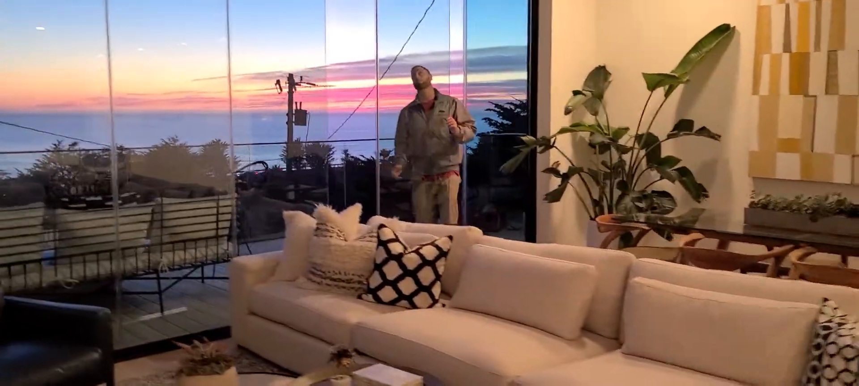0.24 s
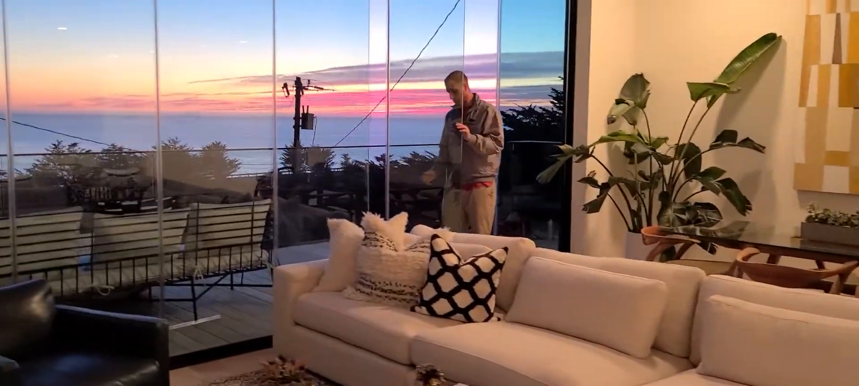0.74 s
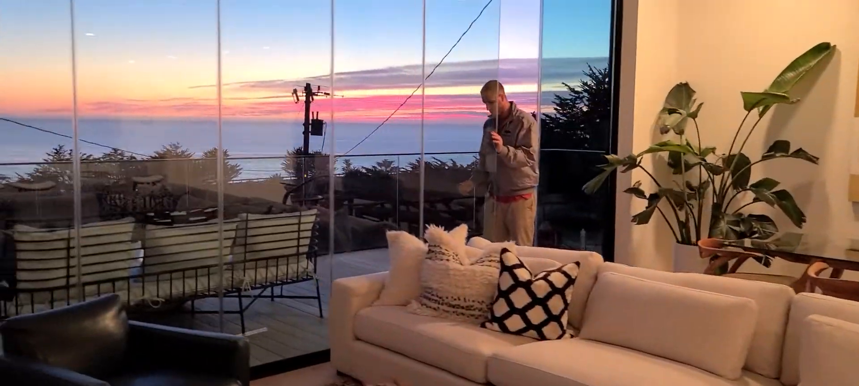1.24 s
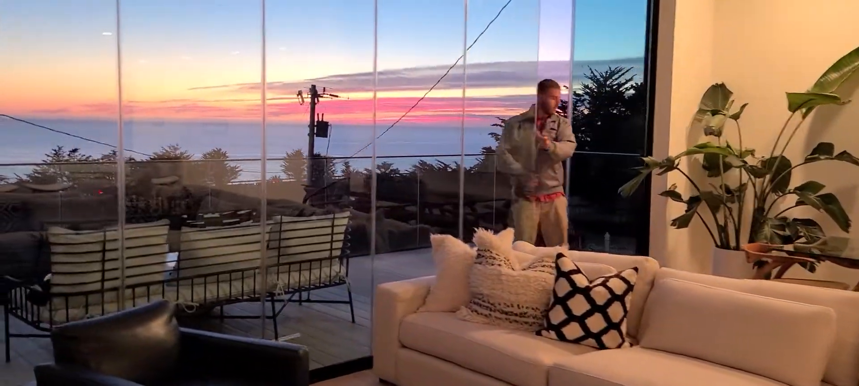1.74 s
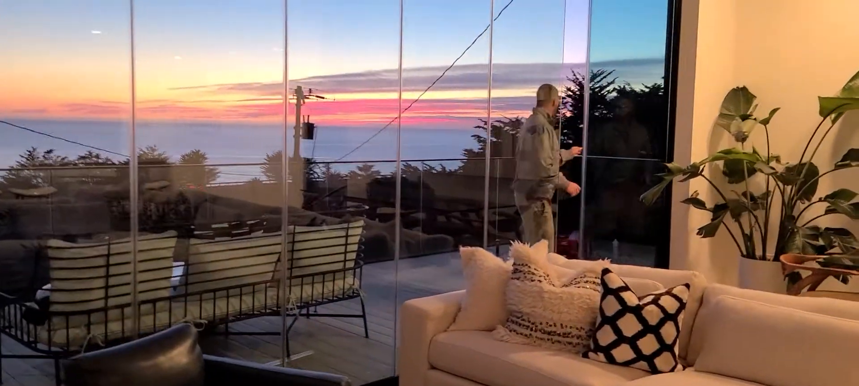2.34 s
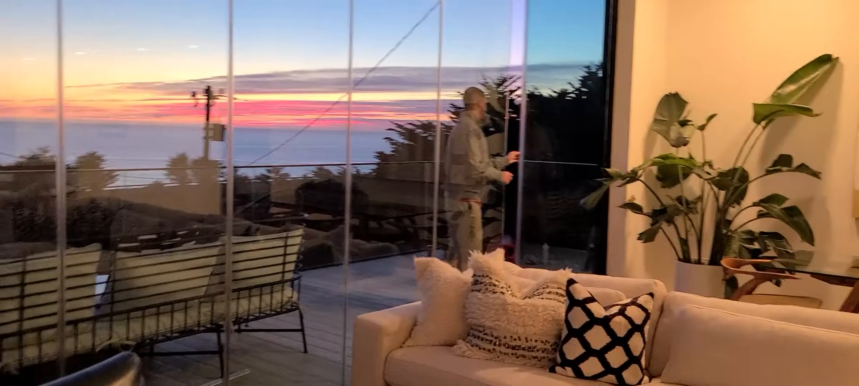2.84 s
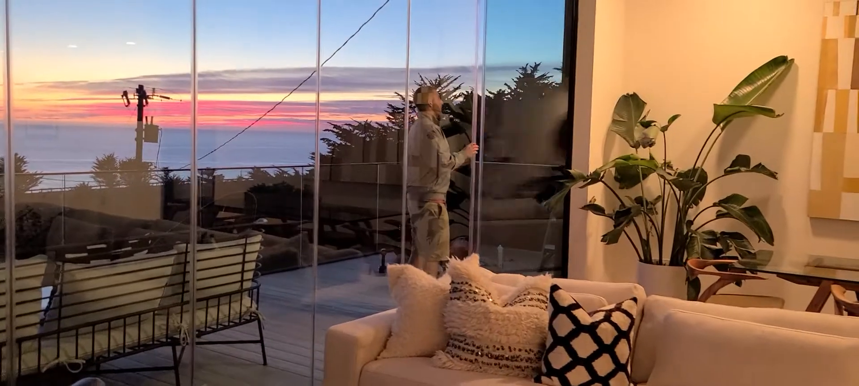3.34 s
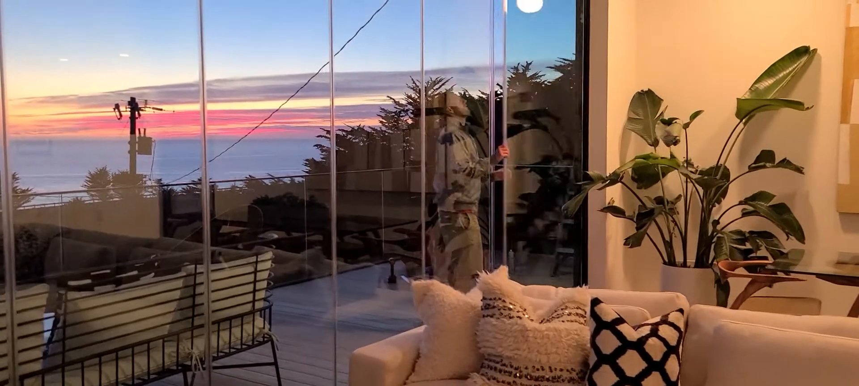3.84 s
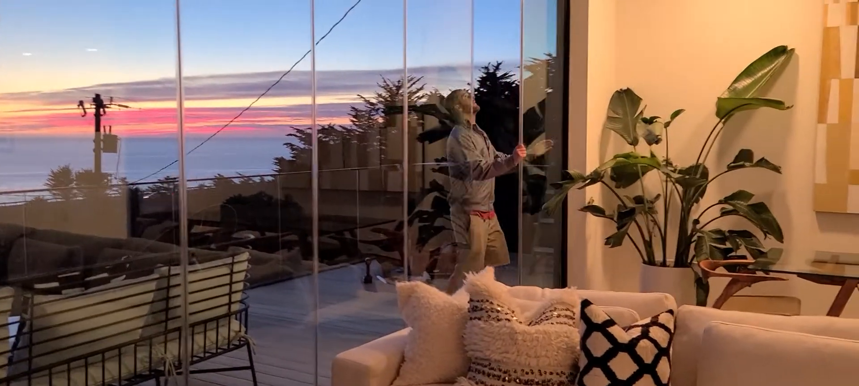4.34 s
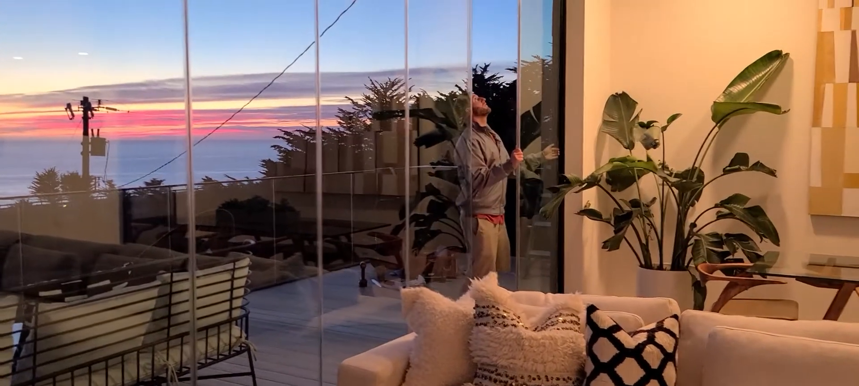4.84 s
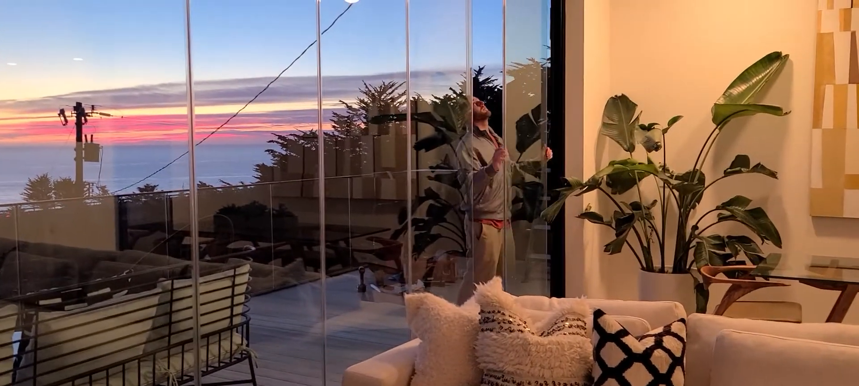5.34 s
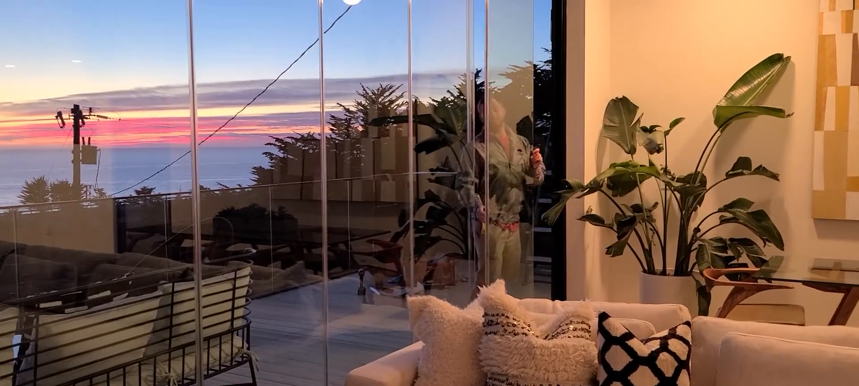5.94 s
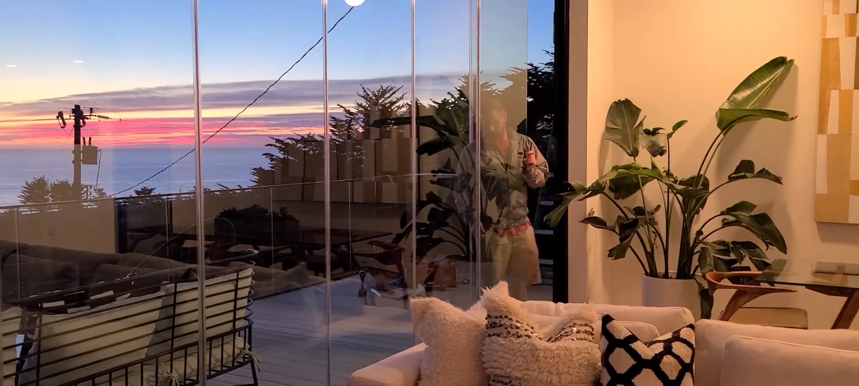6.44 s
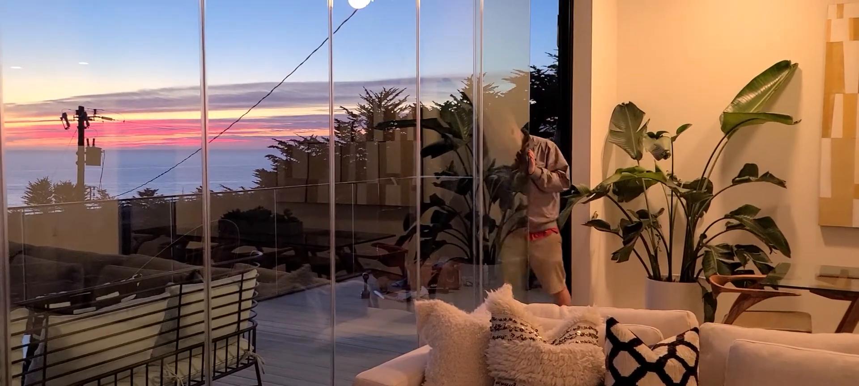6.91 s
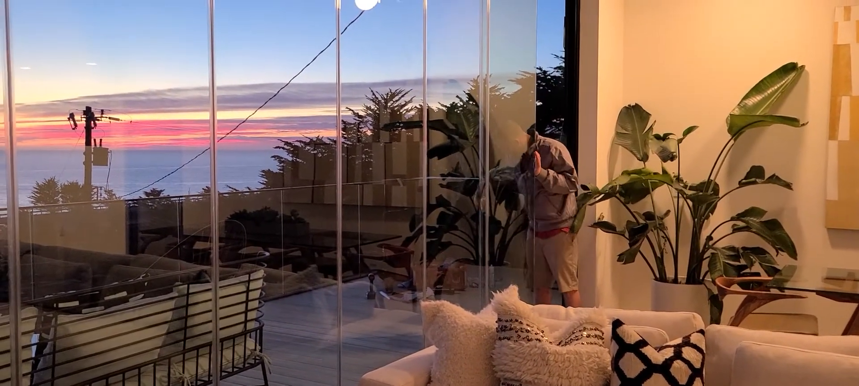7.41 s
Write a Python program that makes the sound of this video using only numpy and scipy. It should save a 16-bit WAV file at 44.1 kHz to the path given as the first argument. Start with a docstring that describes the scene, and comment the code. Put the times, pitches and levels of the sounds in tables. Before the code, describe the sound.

A large, hard, reverberant living room with a faint steady outdoor wash, heard in stereo. From 0 s a heavy glass pane is already rolling on its track, a bright gritty rumble with low boom, gradually easing; a soft dull step falls at 0.9 s. At 1.2-1.3 s four quick, bright, loud knocks crash together with a deep thump and ring into the room. From 1.7 to 3.9 s it is quiet: soft near footsteps at 1.7, 2.6, 2.7 and 3.4 s, with brushing scuffs of shoes and clothes. At 4.0-4.6 s a short, duller push clatters lightly, with a low boom at 4.4 s. From 4.9 s a third push rolls, strongest around 5.1-5.3 s with small rattles, thinning, then a bump at 6.3 s. At 6.5-6.6 s heavy clunks slam with a boom and decay. A faint scuff and tiny knock end it near 7.5 s.

```python
"""Heavy glass panels roll along a track in a large, hard living room, over a distant outdoor wash.
A first push is already rolling and ends in bright knocks at about 1.2 s; soft steps, the first during that
push, and brushing scuffs are heard among the pushes. A second push at 4 s clatters lightly; a third, from
4.9 s, ends in the heavy knocks near 6.6 s, and one faint knock comes last. Rollers are dense clicks, booms
and brushing shaped noise, steps damped sines; a knock is a short rattle exciting pane modes and room."""
import sys
import numpy as np
from scipy import signal
from scipy.fft import rfft, irfft
from scipy.io import wavfile
from scipy.ndimage import uniform_filter1d

SR = 44100
rng = np.random.default_rng(int(sys.argv[2]) if len(sys.argv) > 2 else 0)


def store_pcm(level_fs):
    """Save levels as 16-bit WAV."""
    pcm = np.round(np.clip(level_fs, -1, 1) * 32767).astype(np.int16)
    wavfile.write(sys.argv[1], SR, np.atleast_2d(pcm).T)


N = 338247

# spectral colour of a struck pane and frame: pitch_hz, density_db (per Hz)
PANE_COLOUR = [(24, -32), (45, 2), (120, -9.5), (200, -9.5), (290, -5), (420, -1), (670, -6), (950, -9),
               (1280, -5.5), (1820, -10), (2200, -21.5), (3400, -27), (7000, -47.5), (9000, -63.5),
               (15500, -68)]
# what each push sets off, against its load: brightness_db, flexing_db, hiss_db
PUSH_OFFSETS = [(9.5, 1, -10.5), (-21, -10, -16), (-12, -0.5, -15.5)]


def gain_of(db):
    """Level: 20 dB is a factor of ten in amplitude."""
    return 10 ** (np.asarray(db) / 20)


def evened(x):
    """Normalisation: scales a signal to unit root-mean-square."""
    return x / np.sqrt(np.mean(x ** 2) + 1e-20)


def read(points, hz):
    """Logarithmic pitch scale: interpolates a curve evenly per octave."""
    f, value = np.transpose(points)
    return np.interp(np.log(hz + 1), np.log(f + 1), value)


def coloured(x, db_of):
    """Linear filtering: multiplies the spectrum by a gain given in dB as a function of frequency."""
    size = x.shape[-1]
    hz = np.fft.rfftfreq(size, 1 / SR)
    return irfft(rfft(x) * gain_of(db_of(hz)), size)


def causal(db):
    """Minimum phase: folding the cepstrum gives a filter of this gain that answers only once struck."""
    cepstrum = irfft(np.log(gain_of(np.maximum(db, -100))))
    half = len(cepstrum) // 2
    cepstrum[1:half] *= 2
    cepstrum[half + 1:] = 0
    return np.exp(rfft(cepstrum))


def diffuse(length, patchy_db=0):
    """Diffuse-field coherence: two channels of noise, alike in the bass and mostly unrelated in the treble."""
    # likeness of the two channels: pitch_hz, coherence (0 to 1)
    coherence = [(60, 0.98), (130, 0.97), (290, 0.99), (640, 0.4), (1410, 0.21), (3100, 0.083), (6820, 0.1),
                 (15000, 0.16)]
    lag_s, lag_from_hz = 0.000458, 700  # the shared part reaches the right port later above this pitch
    hz = np.fft.rfftfreq(512, 1 / SR)
    a, b, c, d, patches = rng.standard_normal((length // 128 + 5, 257, 5)).T
    patches = uniform_filter1d(patches, size=6, axis=0)  # smooth over frequency, then over time
    patches = evened(uniform_filter1d(patches, size=24, axis=1))
    same = np.clip(read(coherence, hz), -1, 1)[:, None]
    left, unrelated = a + 1j * b, c + 1j * d
    lag = np.exp(-2j * np.pi * hz * lag_s / (1 + (lag_from_hz / (hz + 1)) ** 3))[:, None]
    right = same * left * lag + np.sqrt(1 - same ** 2) * unrelated
    z = np.array([left, right]) * gain_of(patchy_db * patches)
    return evened(signal.istft(z, nperseg=512, noverlap=384)[1][:, :length])


def room(early_db=6, early_s=.012, build_s=.012):
    """Reverberation: a quick cluster of first arrivals, then a tail that fills in and dies band by band."""
    # decay time of the room: pitch_hz, t60_s
    decay = [(60, 1), (160, 0.84), (420, 0.85), (1100, 0.96), (2900, 0.92), (5400, 0.87), (7700, 0.65),
             (11000, 0.52), (15000, 0.23)]
    hz, t, z = signal.stft(diffuse(SR * 3 // 2), SR, nperseg=256)
    t60 = np.maximum(read(decay, hz), .1)[:, None]
    tail = signal.istft(z * gain_of(-60 * t / t60), SR, nperseg=256)[1]
    t = np.arange(tail.shape[1]) / SR
    early = gain_of(early_db) * np.exp(-t / early_s)
    tail = tail * (early + 1 - np.exp(-t / build_s))
    return tail / np.linalg.norm(tail[0])


def load(t, offsets_db, share, fade):
    """Driven friction: gain of a layer following the roller load during each push, by a share of its dB."""
    # load on the rollers, one list a push: time_s, load_db
    pushes = [
        [(0, -38.5), (.1, -44), (.7, -48), (1.17, -53)],
        [(4.03, -47.5), (4.2, -51), (4.35, -46), (4.6, -50)],
        [(4.93, -52.5), (5.03, -41), (5.14, -37), (5.28, -42.5), (5.45, -43), (5.65, -47), (6.18, -50),
         (6.35, -41), (6.52, -59)],
    ]
    mean_load_db = -47
    out = np.zeros(len(t))
    for rows, offset_db in zip(pushes, offsets_db):
        s, db = np.transpose(rows)
        on = ((t >= s[0]) | (s[0] <= 0)) & (t <= s[-1])  # the first push began earlier
        followed_db = share * (np.interp(t, s, db) - mean_load_db)
        out += on * gain_of(offset_db + mean_load_db + followed_db)
    return uniform_filter1d(out, int(fade * SR) + 1)  # fade in seconds


def swells(rows):
    """Addition of powers: separate swells rise to a peak and decay exponentially, straight lines in dB."""
    t = np.arange(N) / SR
    power = 0
    for s, db, rise, fall in rows:
        level_db = db - rise * np.maximum(s - t, 0) - fall * np.maximum(t - s, 0)
        power = power + gain_of(level_db) ** 2
    return power


def wash():
    """Broadband noise: the steady outdoor wash through the opening is coloured, faintly patchy noise."""
    # colour of the outdoor wash: pitch_hz, density_db (per Hz)
    colour = [(12, -33), (20, -42), (59, -11), (106, -5.5), (166, -29), (232, -3.5), (416, -6), (746, -1),
              (1040, -7), (1630, -5.5), (2470, -20.5), (5850, -34), (7310, -28.5), (8400, -40.5),
              (15500, -39)]
    level_db = -55.5
    noise = diffuse(N, patchy_db=2.0)
    return gain_of(level_db) * evened(coloured(noise, lambda hz: read(colour, hz)))


def steps(rooms):
    """Damped oscillation: each soft near step is a few dull cycles, dry and central, with a little room."""
    # soft steps near the microphone: start_s, level_db, pitch_hz
    footfalls = [(0.858, -29.5, 342), (1.733, -30, 206), (2.572, -38.5, 248), (2.723, -38.5, 99),
                 (3.383, -43.5, 196)]
    t60_s, rise_s, room_db = .05, 0.00067, -9
    out, t = np.zeros(N + SR), np.arange(4000) / SR
    envelope = gain_of(-60 * t / t60_s) * (1 - np.exp(-t / rise_s))
    for s, db, hz in footfalls:
        out[round(s * SR):][:len(t)] += gain_of(db) * envelope * np.sin(2 * np.pi * hz * t)
    reverberant = signal.fftconvolve(out[None, :N], rooms[0], axes=1)[:, :N]
    return out[:N] + gain_of(room_db) * reverberant


def scuffs():
    """Friction noise: the hiss of a sliding pane, and shoes and clothes brushing, each with its own treble."""
    # colour of brushing: pitch_hz, density_db (per Hz)
    colour = [(300, -22), (1000, 8.5), (2500, 1.5), (4000, -2.5), (7000, -11.5), (9000, -18.5),
              (15500, -20.5)]
    # shoes and clothes brushing: peak_s, level_db, fall_db_per_s, treble_db (against level_db)
    brushes = [(1.68, -53.5, 50, -3), (1.9, -54.5, 42, -2.5), (2.39, -55.5, 83, -4), (2.64, -66.5, 82, 7),
               (2.78, -53.5, 46, -11), (3.42, -64.5, 54, 8), (3.55, -65, 90, -1), (3.88, -68, 93, 4),
               (4.2, -52, 74, -1), (4.34, -51.5, 100, 3), (5.25, -49.5, 41, -1.5), (7.28, -56, 59, -12),
               (7.5, -64, 69, -4)]
    rise_ratio = 1.73  # a scuff rises this many times as fast as it falls
    hiss = evened(coloured(diffuse(N, patchy_db=.6), lambda hz: read(colour, hz)))
    treble = coloured(hiss, lambda hz: -30 / (1 + (hz / 5000) ** 6))
    hiss_db = [push[2] for push in PUSH_OFFSETS]
    sliding = load(np.arange(N) / SR, hiss_db, share=0.78, fade=.04)
    body = swells([(s, db, rise_ratio * fall, fall) for s, db, fall, _ in brushes])
    top = swells([(s, db + treble_db, rise_ratio * fall, fall) for s, db, fall, treble_db in brushes])
    return (hiss - treble) * np.sqrt(sliding ** 2 + body) + treble * np.sqrt(sliding ** 2 + top)


def boom():
    """Flexural vibration: low, nearly mono noise follows the pushes and swells at each boom."""
    # colour of flexing: pitch_hz, density_db (per Hz)
    colour = [(8.8, -45), (15, -1.5), (49, 1), (69, -2), (113, -10.5), (183, -14.5), (200, -15), (260, -13),
              (440, -120)]
    # booms of the panes and the floor: peak_s, level_db, rise_db_per_s, fall_db_per_s
    surges = [(0.01, -36.5, 100, 50), (1.05, -43, 56, 80), (1.24, -25.5, 500, 67), (1.33, -29, 200, 78),
              (1.75, -49, 60, 22), (2.6, -53, 107.5, 16), (3.87, -56.5, 46, 123), (4.42, -31.5, 300, 59),
              (5.27, -39, 77, 37), (5.99, -46.5, 100, 62), (6.61, -27.5, 190, 74), (7.32, -50.5, 55, 90)]
    rest_db = -62.5  # flexing never quite stops
    low = evened(coloured(diffuse(N), lambda hz: read(colour, hz)))
    flexing_db = [push[1] for push in PUSH_OFFSETS]
    rolling = load(np.arange(N) / SR, flexing_db, share=0.5, fade=0.062)
    return low * np.sqrt(rolling ** 2 + swells(surges) + gain_of(rest_db) ** 2)


def rollers(rooms):
    """Random impulse excitation: grit under the rollers sends dense uneven clicks into the pane."""
    lead = SR  # samples of rolling already under way, so that the room is filled from the start
    t = np.arange(-lead, N) / SR
    click_db = 4.6 * np.minimum(rng.exponential(1, len(t)), 5)
    struck = rng.random(len(t)) < 1500 / SR  # 1500 clicks a second on average
    clicks = gain_of(click_db) * struck * rng.choice([-1, 1], len(t))
    grit = evened(coloured(clicks, lambda hz: read(PANE_COLOUR, hz)))
    treble = coloured(grit, lambda hz: -12 * np.log2(1 + 2500 / (hz + 1)))
    bright_db = [push[0] for push in PUSH_OFFSETS]
    body_gain = load(t, [0, 0, 0], share=1, fade=.0067)
    treble_gain = load(t, bright_db, share=1, fade=.0067)
    rolling = (grit - treble) * body_gain + treble * treble_gain
    # the pane travels, so the path through the room keeps changing
    turn = np.pi * t * 1.5
    paths = [np.cos(turn), np.sin(turn)]
    heard = sum(signal.fftconvolve((rolling * p)[None], r, axes=1) for p, r in zip(paths, rooms))
    return heard[:, lead:lead + N]


def knocks(rooms):
    """Modal excitation: a short rattling contact takes the pane's colour, rings its modes, fills the room."""
    # knocks of pane on stop or pane: start_s, blow_db, brightness_db_per_octave (above 1500 Hz),
    # bass_db, best_excited_mode_hz, ringing_db (against the thud)
    blows = [(1.185, 12, 9, -28, 1590, -19), (1.217, 14.5, 6, -6.5, 1630, -17),
             (1.265, 14, 2.5, -15, 388, -8), (1.324, 5.5, -4, -12, 1630, -20),
             (4.015, -7.5, 3, -11, 2310, -12.5), (4.077, -11, -15, -2.5, 2050, -8),
             (4.362, -5, 4, -49, 1700, -20), (4.399, -3, 3, -22, 2620, -16), (4.93, -18, 12.5, -3, 503, -3),
             (5.145, -7, -2.5, -21, 1640, -5), (5.167, -6.5, -9, -18, 1660, -14),
             (5.192, -5.5, -6, -24, 1640, -12), (5.24, -1.5, -4.5, -19, 1180, -5),
             (5.309, -12, -18, -2, 1310, -17), (6.269, -7.5, -4.5, 4, 1100, -7.5),
             (6.358, -15.5, 11.5, 12, 3730, -6), (6.522, 0, 3.5, -18, 1520, -1),
             (6.549, 4, 8.5, -10, 2300, -16), (6.566, 19, 0.5, -6.5, 1980, -17.5),
             (6.607, 13, 1, -8.5, 436, -6.5), (7.473, -22.5, -2, -30, 1550, -4)]
    # pane and track modes, the high ones damped clusters: pitch_hz, level_db, t60_s
    modes = [(296, -3, .2), (414, .5, .2), (490, -2, .15), (775, -4, .08), (1163, .5, .06), (1311, -2, .04),
             (1500, -2, .03), (1667, .5, .04), (2050, -1.5, .03), (2750, 2, .01), (3400, 3, .008),
             (4100, 3, .006)]
    contact_s, rise_s = 0.036, 0.0015  # t60 and rise of the contact force
    top_hz, top_per_db, hard_db = 7500, 1.01, 5.5  # harder blows reach further above this pitch
    near_db = 45  # a mode one octave from the best excited one is this much weaker
    body_s, body_hz = 0.004005, 2803  # below this pitch the pane answers this much after the first tick
    out, t = np.zeros((2, N + 3 * SR)), np.arange(16384) / SR
    hz = np.fft.rfftfreq(len(t), 1 / SR)
    chance = rng.standard_normal((len(blows), len(t)))
    force = gain_of(-60 * t / contact_s) * (1 - np.exp(-t / rise_s)) ** 2
    body_lag = np.exp(-2j * np.pi * hz * body_s / np.sqrt(1 + (hz / body_hz) ** 2))
    for k, (s, db, bright, bass_db, best_hz, ring_db) in enumerate(blows):
        # many tiny impacts: spread in time, yet fairly even in spectrum
        z = rfft(chance[k] * force)
        rattle = irfft(z / abs(z) ** .7) * force ** .3
        colour = read(PANE_COLOUR, hz) + bright * np.log2(np.maximum(hz, 1500) / 1500)
        colour = colour + bass_db / (1 + (hz / 500) ** 2)
        colour = colour + top_per_db * (db - hard_db) / (1 + (top_hz / (hz + 1)) ** 8)
        thud = irfft(rfft(rattle) * causal(colour))
        # the place of the blow favours the modes near one pitch
        rings = np.zeros(len(t))
        for f, mode_db, t60 in modes:
            ring_level_db = mode_db - near_db * np.log2(f / best_hz) ** 2 - 60 * t / t60
            rings += gain_of(ring_level_db) * np.sin(2 * np.pi * f * t)
        rung = signal.fftconvolve(rattle, rings)[:len(t)]
        blow = thud / np.linalg.norm(thud) + gain_of(ring_db) * rung / np.linalg.norm(rung)
        blow = irfft(rfft(blow) * body_lag)
        heard = signal.fftconvolve(gain_of(db) * blow[None], rooms[k % len(rooms)], axes=1)
        out[:, round(s * SR):][:, :heard.shape[1]] += heard
    return out[:, :N]


def scene():
    """Superposition: the layers add, sharing five responses of one room."""
    rooms = [room() for _ in range(5)]
    return wash() + steps(rooms) + scuffs() + boom() + rollers(rooms) + knocks(rooms)


def record(dry):
    """Transduction: two ports lean differently with pitch, saturation rounds peaks, then the band limit."""
    # balance of the two microphone ports: pitch_hz, left_minus_right_db
    balance = [(60, -0.5), (110, -1), (200, -1.5), (380, -1), (700, 0), (1290, -3.5), (2380, 2.5),
               (4400, 2), (8120, 11), (11500, 1.5), (15000, 8)]
    edge_hz = 15800
    ports = coloured(dry, lambda hz: np.outer([.5, -.5], read(balance, hz)))
    rounded = ports / (1 + np.abs(ports) ** 6) ** (1 / 6)
    lowpass = signal.firwin(1023, edge_hz, window=("kaiser", 10), fs=SR)
    return signal.oaconvolve(rounded, lowpass[None], "same")


dry = scene()
out = record(dry)
store_pcm(out)
```